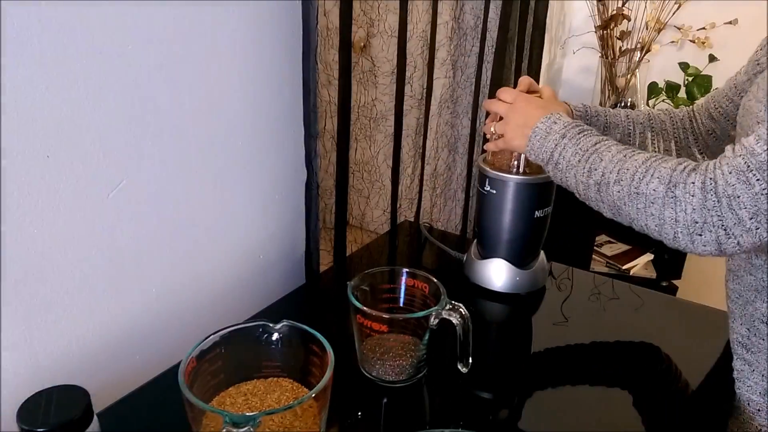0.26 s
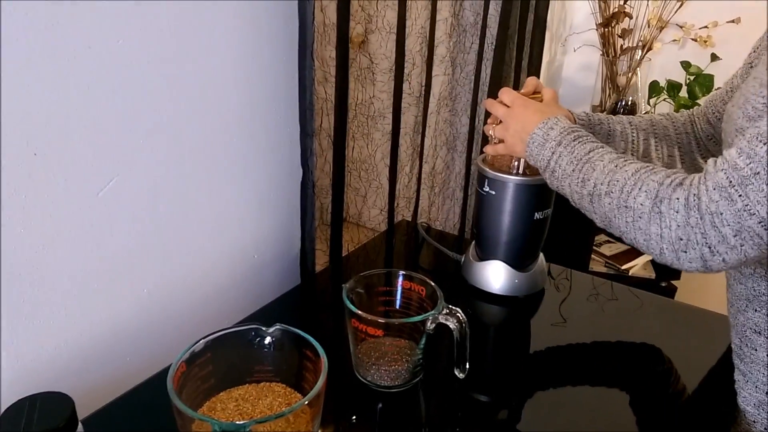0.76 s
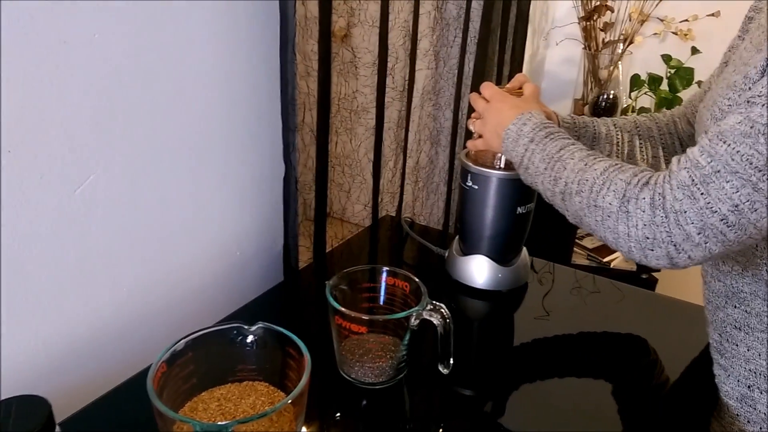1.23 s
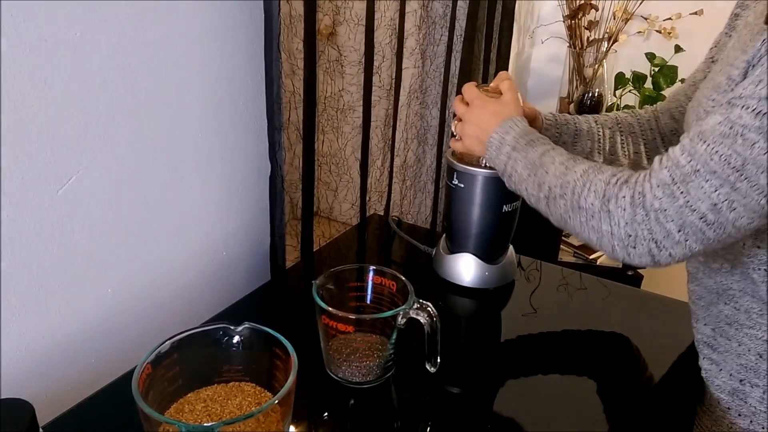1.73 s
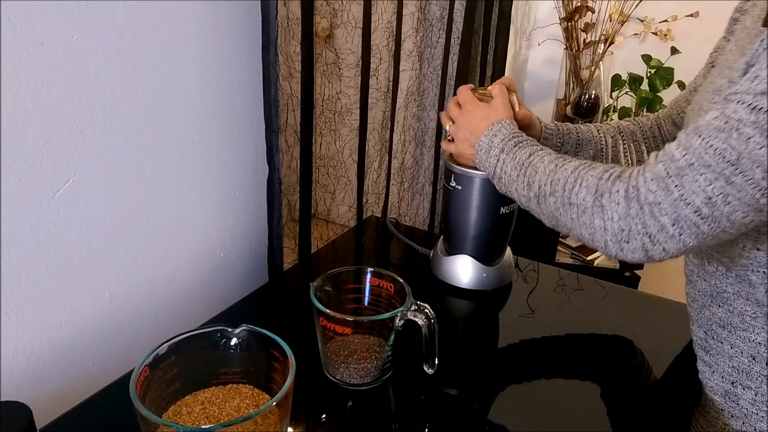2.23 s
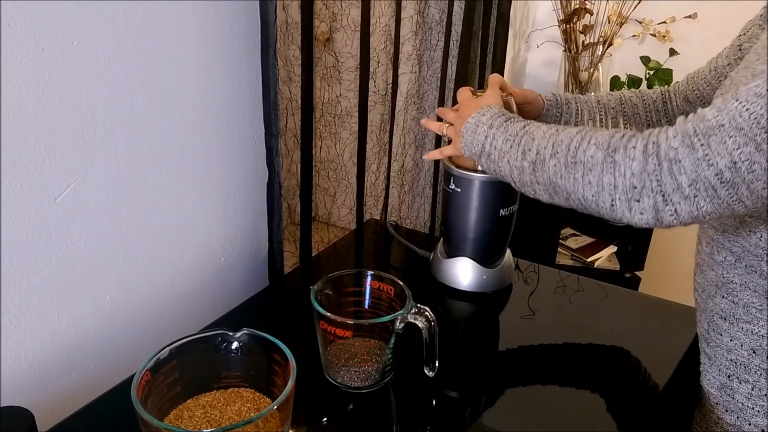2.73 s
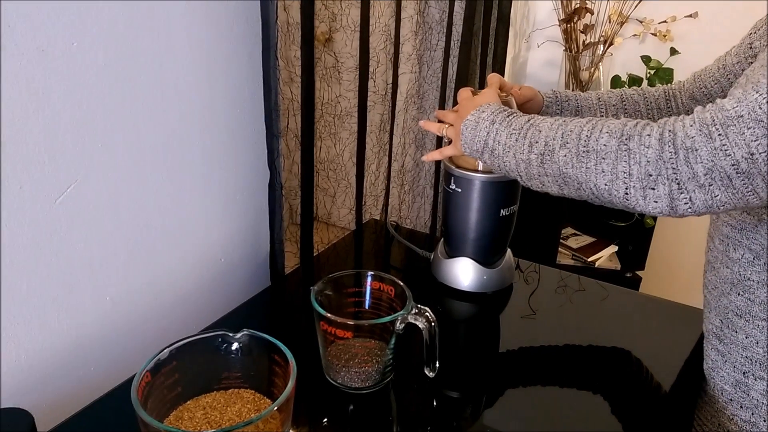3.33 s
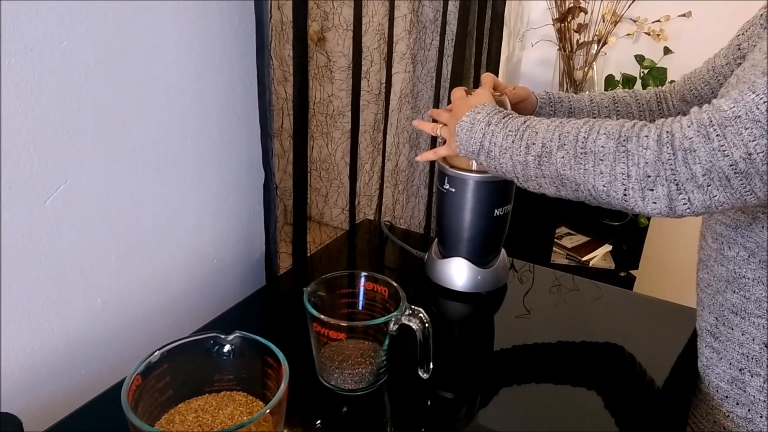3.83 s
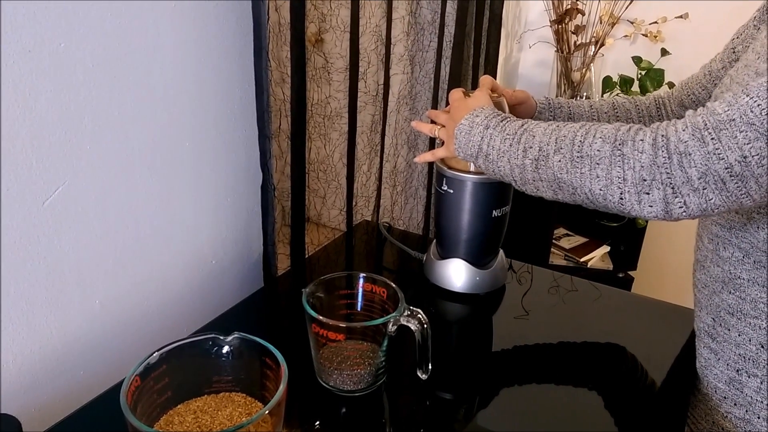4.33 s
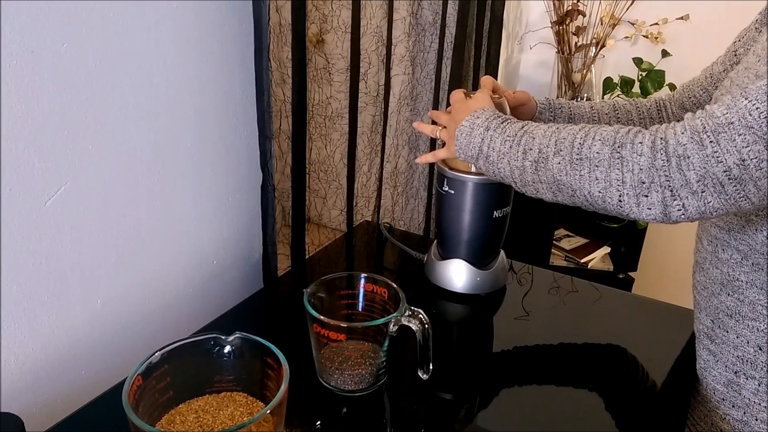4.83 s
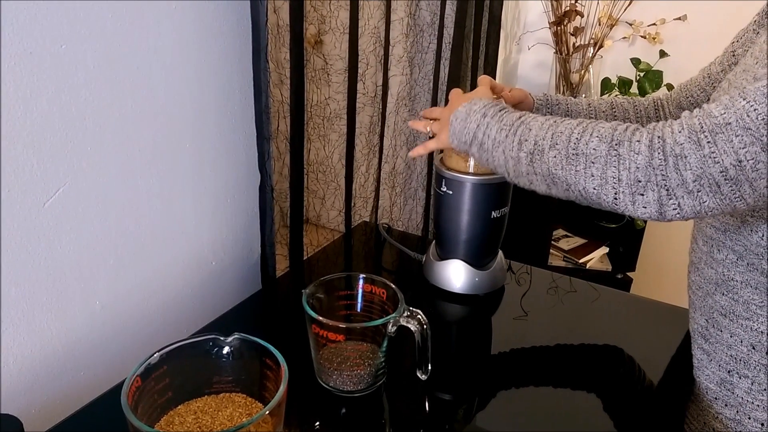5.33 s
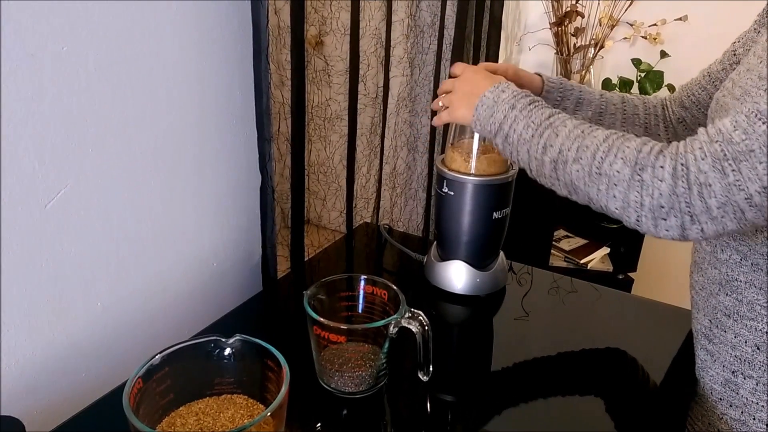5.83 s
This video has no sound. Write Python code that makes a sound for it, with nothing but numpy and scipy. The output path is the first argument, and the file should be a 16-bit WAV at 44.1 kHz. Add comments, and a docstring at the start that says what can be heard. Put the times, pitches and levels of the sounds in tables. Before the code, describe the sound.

Quiet kitchen, light plastic rattles and a sharp double click, then a small blender starts abruptly and runs on, seeds hissing and crackling against plastic.

```python
"""Knocks, clicks and a soft rustle come first: a plastic cup full of hard seeds is set on a small blender's base,
turned and pressed home. Then the motor spins up and the blades fling the seeds against the cup.
Random blows and noise bursts excite resonant bodies; filtered noise gives the rush, the husks and the quiet kitchen.
The left microphone port faces the sound; the right one is shaded and hears it later and duller."""
import sys
import numpy as np
from scipy import signal
from scipy.fft import rfft, irfft, next_fast_len
from scipy.io import wavfile
from scipy.ndimage import uniform_filter1d

SR = 44100
rng = np.random.default_rng(int(sys.argv[2]) if len(sys.argv) > 2 else 0)


def waveform_to_disk(signal):
    """Save audio, clipped to [-1, 1], as 16-bit WAV at the path in sys.argv[1]."""
    frames = np.transpose(np.atleast_2d(signal))
    scaled = np.clip(frames, -1, 1) * 32767
    samples = np.round(scaled).astype(np.int16)
    wavfile.write(sys.argv[1], SR, samples)


N = 267441
SIZE = next_fast_len(N + SR)   # transform length, with room for the reflections
HZ = np.maximum(np.fft.rfftfreq(SIZE, 1 / SR), 1)
TIME = np.arange(N) / SR

# Resonances of the base: (frequency [Hz], width [Hz], relative level [dB])
BASE_MODES = [(174, 84, -35), (247, 44, -19.5), (286.6, 13, -11.5), (356.7, 29, -3.5), (388.8, 18.3, 2),
              (423.5, 27.3, 3), (475, 17.8, -1.5), (502.6, 10.4, -4), (557.5, 42, -4), (579, 98, -11),
              (713, 50, -10.5), (794, 49, -15.5)]
# Resonances of the plastic cup: (frequency [Hz], width [Hz], relative level [dB])
CUP_MODES = [(935, 70, -3.5), (1041, 81, -0.5), (1250, 78, 4), (1383, 82, 5), (1570, 130, 1), (1630, 44, 6),
             (1730, 103, 1), (2150, 300, -22.5), (2270, 170, -27), (2520, 76, -10.5), (2678, 40, -7),
             (2837, 44, -4.5), (2913, 155, -15), (3173, 57, -6.5), (3360, 65, -8.5), (3900, 350, -12),
             (4197, 100, -3), (4356, 160, -7.5), (4547, 59, -3.5), (4878, 126, -6), (4970, 67, -12),
             (5097, 77, -11.5), (7500, 72, -18)]
# Seeds in flight against the cup wall: (time [s], relative level [dB])
FLIGHT_LEVEL = [(1.81, -34), (1.82, -31.5), (1.89, -18.5), (1.96, -20.5), (2.08, -18.5), (2.12, -24),
                (2.19, -19.5), (2.57, -19.5), (2.64, -22.5), (2.73, -19), (2.79, -22), (2.86, -20),
                (3.17, -19), (3.23, -20.5), (3.3, -19.5), (5.53, -19.5), (5.58, -17.5), (5.72, -19),
                (5.75, -21.5), (5.79, -19.5), (6.0, -19), (6.04, -22.5)]
# Shaking of the base, in two lurches at first: (time [s], relative level [dB])
SHAKE_LEVEL = [(1.81, -28.5), (1.83, -28), (1.91, -23), (1.96, -29.5), (2.02, -23), (2.13, -31), (2.7, -28),
               (2.85, -26.5), (3.9, -26.5), (4.0, -31.5), (4.4, -27), (5.7, -29), (5.78, -34), (5.9, -25),
               (6.06, -31.5)]
# Early clumps of shattering whole seeds: (time [s], added level [dB])
HUSK_CLUMPS = [(1.9, 1.3), (2.07, 4.3)]
# Spectrum of the cracking husks: (frequency [Hz], relative level [dB])
HUSK_SPECTRUM = [(1500, -18), (3000, -8), (5000, 2.5), (8000, -1.5), (10000, -2.5), (13000, -9.5),
                 (15000, -8.5), (15800, -25)]
# Spectrum of air and dust whirled by the blades: (frequency [Hz], relative level [dB])
RUSH_SPECTRUM = [(600, -24), (1500, -8), (2050, -2), (2800, -1.5), (4500, -3), (6000, -11.5), (8000, -17),
                 (11000, -39.5), (15800, -62)]
START_S = 1.81   # the motor switches on
RUN_HZ, SPIN_UP_S = 214, 0.1   # final shaft turns per s, time constant
LAG_HZ, EASE_S = 12, 1.0   # turns per s held back by the load, time constant of its easing
FLIGHT_MEAN_DB, FLIGHT_FLICKER_DB, SHAKE_FLICKER_DB = -17.5, 0.5, 1.5
# Whole husks fade away; their level swings along with the flight, with a flicker of its own
HUSK_DB, HUSK_FADE_DB_PER_S, HUSK_FOLLOWS, HUSK_FLICKER_DB = -20.5, 4, 1, 2
CLUMP_S = 0.012   # half length of a clump, to 1/e of its added dB
# Meal gathers in the cup
MEAL_DB, MEAL_SHORT_DB, MEAL_BUILD_S, MEAL_GROWS_DB_PER_S = -26.5, 12.5, 0.19, 0.17
MEAL_FOLLOWS, MEAL_FLICKER_DB = 0.79, 1.5
HUM_DB, HUM_EARLY_DB, HUM_SETTLE_S = -43.5, 4, 1.2
HUM_FROM_S, HUM_WAVER_DB, HUM_WAVER_PER_S = 1.93, 2, 4


def blender():
    """Impact excitation: thousands of blows a second ring cup and base, harder once a turn; the shaft hums."""
    running = np.maximum(TIME - START_S, 0)
    spin_up = (RUN_HZ - LAG_HZ) * np.exp(-running / SPIN_UP_S)
    turns = RUN_HZ - spin_up - LAG_HZ * np.exp(-running / EASE_S)

    wall_db = in_time(FLIGHT_LEVEL)[0] + FLIGHT_FLICKER_DB * drift(12.5)
    swing_db = wall_db - FLIGHT_MEAN_DB
    husk_db = HUSK_DB - HUSK_FADE_DB_PER_S * running + HUSK_FOLLOWS * swing_db + HUSK_FLICKER_DB * drift(9.5)
    husk_db = husk_db + sum(db * np.exp(-((TIME - s) / CLUMP_S) ** 2) for s, db in HUSK_CLUMPS)
    meal_db = MEAL_DB - MEAL_SHORT_DB * np.exp(-running / MEAL_BUILD_S) + MEAL_GROWS_DB_PER_S * running
    meal_db = meal_db + MEAL_FOLLOWS * swing_db + MEAL_FLICKER_DB * drift(15.0)
    base_db = in_time(SHAKE_LEVEL)[0] + SHAKE_FLICKER_DB * drift(7.0)
    hum_db = HUM_DB + HUM_EARLY_DB * np.exp(-running / HUM_SETTLE_S) + HUM_WAVER_DB * drift(HUM_WAVER_PER_S)

    angle = 2 * np.pi * np.cumsum(turns) / SR
    sweep = (1 + 0.16 * np.cos(angle)) * (TIME >= START_S)

    # five rows: the near side of the cup, then four far sides
    blows = impacts(1500, spread_db=3.0, count=5)
    high_modes = [mode for mode in CUP_MODES if mode[0] > 2000]
    low_modes = [mode for mode in CUP_MODES if mode[0] < 2000]
    wall = from_db(wall_db + 1.5) * rms_one(body(blows, high_modes))
    meal = from_db(meal_db) * rms_one(body(blows, low_modes))
    air_noise = rng.standard_normal((5, N))
    rush = from_db(wall_db) * rms_one(shape(air_noise, from_db(at_hz(RUSH_SPECTRUM, HZ))))
    cracks = impacts(6000, spread_db=2.5, count=5)
    husks = from_db(husk_db) * rms_one(shape(cracks, from_db(at_hz(HUSK_SPECTRUM, HZ))))
    shaking = impacts(450, spread_db=2.0, count=1)[0]
    base = from_db(base_db) * rms_one(body(shaking, BASE_MODES))

    spun_up = np.clip((TIME - HUM_FROM_S) / 0.017, 0, 1)
    hum = from_db(hum_db) * spun_up * np.sin(angle)
    small = signal.butter(2, 170, "high", fs=SR, output="sos")   # a small body radiates little bass
    grinding = signal.sosfilt(small, sweep * (wall + meal + rush + husks))
    return grinding, signal.sosfilt(small, sweep * base) + hum


# Knocks of the cup against the base, and near 1.81 s the jolt of the motor starting, relative levels: (time
# [s], dull snap [dB], bright snap [dB], thud in the base [dB], push into the counter [dB])
KNOCK_EVENTS = [(0.029, -61, -79, -46.5, -50), (0.107, -55, -62, -45, -49),
                (0.162, -27.5, -30.5, -30.5, -28), (0.17, -36, -41, -21.5, -47),
                (0.543, -58, -39.5, -52.5, -59), (0.66, -51, -47, -61, -64), (0.81, -29.5, -34.5, -41, -55),
                (0.815, -33, -49, -28, -46), (1.109, -53, -50, -63, -57), (1.12, -53, -41.5, -58, -65),
                (1.134, -60, -47, -61, -64), (1.153, -48, -42, -70, -66), (1.164, -55, -54, -69, -68),
                (1.191, -51, -38, -66, -64), (1.236, -15, -14, -13, -26.5), (1.245, -20, -20, -38, -46),
                (1.248, -36, -10.5, -59, -47), (1.259, -27, -44, -47, -40), (1.447, -49, -45, -51, -51),
                (1.735, -59, -36.5, -62, -64), (1.804, -32, -44, -37, -38), (1.811, -15, -9.5, -22, -28),
                (1.826, -10, -27, -9.5, -24.5)]
# Spectrum of the plastic snap: (frequency [Hz], relative level [dB])
SNAP_SPECTRUM = [(400, -57), (800, -8), (1500, 3), (3000, 6), (5000, 2.5), (7000, -6), (9000, -3.5),
                 (12000, -19), (15800, -17)]
# Resonances of the counter top: (frequency [Hz], width [Hz], relative level [dB])
COUNTER_MODES = [(172, 34, 9.5), (210, 170, 3.5)]
# Resonances of the cupboard below: (frequency [Hz], width [Hz], relative level [dB])
CABINET_MODES = [(35, 30, -11), (70.4, 27, 4.5)]
SNAP_T60_S = 0.016
THUD_IN_BASE_DB, THUD_IN_COUNTER_DB, THUD_IN_CABINET_DB = 33, 29.5, 12   # how strongly each body answers


def knocks():
    """Modal response: each rattle and push rings cup, base and counter; also the same blows as clean clicks."""
    bursts, clicks = np.zeros((2, N)), np.zeros((4, N))
    age = np.arange(2000) / SR
    fade = np.minimum(age / 0.0019, 1) * from_db(-60 * age / SNAP_T60_S)
    click_gain = np.sqrt(np.sum(fade ** 2))   # a click carries the energy of its burst
    for s, *levels_db in KNOCK_EVENTS:
        at = round((s - 0.0005) * SR)
        bursts[:, at:at + len(age)] += from_db(levels_db[:2])[:, None] * fade
        clicks[:, at] = from_db(levels_db) * click_gain

    # dull and bright snaps share the spectrum about a crossover at 3200 Hz
    bright = 1 / (1 + (3200 / HZ) ** 3)
    colour = from_db(at_hz(SNAP_SPECTRUM, HZ) + 17.5) * np.array([1 - bright, bright])
    snaps = shape(bursts * rng.standard_normal((2, N)), colour).sum(axis=0)
    clean = shape(clicks[:2], colour).sum(axis=0)

    thuds = from_db(THUD_IN_BASE_DB) * body(clicks[2], BASE_MODES)
    thuds = thuds + from_db(THUD_IN_COUNTER_DB) * body(clicks[3], COUNTER_MODES)
    thuds = thuds + from_db(THUD_IN_CABINET_DB) * body(clicks[2], CABINET_MODES)
    knocked = snaps + from_db(-5) * body(snaps, CUP_MODES) + thuds
    return knocked, from_db(-5.5) * (clean + thuds)


# Hands shifting on the cup: (start [s], end [s], level [dB])
HAND_MOVES = [(0.0, .075, -63), (.1, .155, -61), (.752, .805, -83), (1.75, 1.8, -66)]
# Spectrum of skin on plastic: (frequency [Hz], relative level [dB])
SKIN_SPECTRUM = [(300, -25), (600, -3), (1000, 10), (1500, 3), (2300, 6), (3300, -9), (5000, -19),
                 (9000, -28)]


def rustle():
    """Friction noise: shaped random noise sounds while the fingers move."""
    level = sum(from_db(db) * (TIME >= start) * (TIME < end) for start, end, db in HAND_MOVES)
    friction = rms_one(shape(rng.standard_normal(N), from_db(at_hz(SKIN_SPECTRUM, HZ))))
    return uniform_filter1d(level, size=300) * friction


# Reverberation time: (frequency [Hz], time to fall 60 dB [s])
REVERB_TIME = [(150, 0.075), (400, 0.28), (1040, 0.52), (2760, 0.33), (7280, 0.38), (14000, 0.15)]
# Strength of the reflections: (frequency [Hz], relative level [dB])
REVERB_LEVEL = [(150, -5.5), (500, 5.5), (1500, 3.5), (5000, -0.5), (14000, -1)]


def kitchen():
    """Diffuse reverberation: noise for both ports dies exponentially band by band, shared in the bass."""
    age = np.arange(SR // 2) / SR
    white = rng.standard_normal((2, 2, len(age)))   # neighbouring bands get unrelated noise
    tail = 0
    edges = 60 * 2 ** np.arange(0, 8.4, 1.0)   # octaves
    for k, (low, high) in enumerate(zip(edges, edges[1:])):
        hz = np.sqrt(low * high)
        band = signal.butter(2, [low, high], "band", fs=SR, output="sos")
        mid, side = signal.sosfilt(band, white[k % 2])
        alike = np.clip(450 / hz, 0, 0.9)
        onset = np.clip((age - 0.002) / 0.0041, 0, 1)
        dying = from_db(-60 * age / at_hz(REVERB_TIME, hz)) * onset
        pair = two_ports(mid, side, alike)
        tail = tail + from_db(at_hz(REVERB_LEVEL, hz)) * pair * dying / np.sqrt(2 * np.sum(dying ** 2))
    return rfft(tail, SIZE)


# Spectrum of the quiet kitchen: (frequency [Hz], relative level [dB])
AIR_SPECTRUM = [(12, -48), (20, -3), (27, -2), (55, -10), (119, -14), (149, -4), (187, -12.5), (443, -14),
                (482, -15), (655, -25.5), (1840, -20), (13400, -37.5), (15800, -42)]
# Likeness of that hush at the two ports: (frequency [Hz], left-right likeness [0 to 1])
AIR_LIKENESS = [(60, 0.49), (300, 0.8), (640, 0.77), (1400, 0.0093), (15000, 0)]
# Appliance hum: (frequency [Hz], relative level [dB])
MAINS_TONES = [(120, -61), (180, -83.5), (240, -77), (300, -70), (420, -67.5), (480, -70.5)]


def quiet_air():
    """Partial coherence: a steady hush, most alike at the ports in the low mids, over a faint mains hum."""
    mid, side = rfft(rng.standard_normal((2, N)), SIZE)
    pair = two_ports(mid, side, np.clip(at_hz(AIR_LIKENESS, HZ), 0, 1))
    hush = rms_one(irfft(pair * from_db(at_hz(AIR_SPECTRUM, HZ)), SIZE)[:, :N])
    hum = sum(from_db(db - 3.0) * np.sin(2 * np.pi * hz * TIME) for hz, db in MAINS_TONES)
    return (from_db(-59.5) * hush + hum) * from_db([[1.2], [-1.2]])   # left a little louder


def from_db(db):
    """Logarithmic level: decibels to amplitude gain."""
    return 10 ** (np.asarray(db) / 20)


def rms_one(x):
    """Normalisation: scale to unit rms."""
    return x / np.sqrt(np.mean(x ** 2) + 1e-20)


def in_time(rows):
    """Linear interpolation: columns of a curve table, one value per sample."""
    s, *columns = np.transpose(rows)
    return [np.interp(TIME, s, column) for column in columns]


def at_hz(points, hz):
    """Logarithmic pitch axis: a spectrum table interpolated over log frequency."""
    table_hz, values = np.array(points).T
    return np.interp(np.log(hz), np.log(table_hz), values)


def shape(x, gain):
    """Linear filtering: multiply the spectrum by a gain per frequency."""
    return irfft(rfft(x, SIZE) * gain, SIZE)[..., :N]


def two_ports(mid, side, alike):
    """Coherence: mix two unrelated noises into a left-right pair of given likeness."""
    return np.sqrt(1 + alike) * mid + np.sqrt(1 - alike) * side * [[1], [-1]]


def body(force, modes):
    """Modal superposition: parallel damped resonances of alternating sign."""
    out = 0
    for k, (hz, width_hz, db) in enumerate(modes):
        r = np.exp(-np.pi * width_hz / SR)
        zeros = [(1 - r * r) / 2, 0, (r * r - 1) / 2]
        poles = [1, -2 * r * np.cos(2 * np.pi * hz / SR), r * r]
        out = out + (-1) ** k * from_db(db) * signal.lfilter(zeros, poles, force + 1e-18)
    return out


def impacts(per_s, spread_db, count):
    """Shot process: random tiny blows of uneven size and sign, in unrelated rows."""
    sizes = from_db(spread_db * np.minimum(rng.exponential(1, (count, N)), 5))
    signs = rng.choice([-1, 1], (count, N))
    return sizes * signs * (rng.random((count, N)) < per_s / SR)


def drift(per_s):
    """Low-passed randomness: slow wandering with unit rms."""
    r = np.exp(-2 * np.pi * per_s / SR)
    return rms_one(signal.lfilter([1], [1, -2 * r, r * r], rng.standard_normal(N + SR))[SR:])


# Extra gain of the direct sound at the right port: (frequency [Hz], level [dB])
FAR_PORT_DIRECT = [(500, 1), (1500, -7.5), (4000, -16), (8000, -24), (14000, 6)]
# Left port over right, for direct and reflected sound: (frequency [Hz], level difference [dB])
PORT_SHADE = [(60, 2), (200, 4.5), (380, 2.5), (700, 0.5), (1290, 3), (1680, -1), (2050, 2), (2600, 4),
              (4400, 9.5), (8120, 12), (10500, 18), (13000, 14.5), (15000, 30)]
RIGHT_LAG_S = 0.00023
MOTOR_DB = 9   # gain of the running machine, ahead of the recorder's compression
HOLLOW_HZ, HOLLOW_WIDTH_HZ, HOLLOW_DEPTH = 2047, 230, 0.28   # the counter's echo weakens a band


def scene():
    """Direct and reverberant field: the near side is direct; walls return other sides, different at each port."""
    knocked, blows = knocks()
    hands = rustle()
    grinding, base = [from_db(MOTOR_DB) * part for part in blender()]
    hollow = 1 - HOLLOW_DEPTH * np.exp(-((HZ - HOLLOW_HZ) / HOLLOW_WIDTH_HZ) ** 2)
    cup = rfft(grinding, SIZE) * hollow

    facing = np.array([np.ones(len(HZ)), from_db(at_hz(FAR_PORT_DIRECT, HZ))])
    direct = (rfft(knocked + hands + base, SIZE) + cup[0]) * facing
    far_sides = cup[1:3] * kitchen() + cup[3:] * kitchen()
    reflected = rfft(blows + hands + from_db(-5.5) * base, SIZE) * kitchen() + far_sides / np.sqrt(2)

    late = np.exp(-2j * np.pi * HZ * RIGHT_LAG_S)
    ports = np.array([np.ones(len(HZ)), late * from_db(-at_hz(PORT_SHADE, HZ))])
    return irfft((direct + reflected) * ports, SIZE)[:, :N] + quiet_air()


LOUD_DB, SQUEEZE, REACT_S = -42.5, 0.25, 0.057   # threshold, dB removed per dB above it, time constant
CUTOFF_HZ = 16000


def record(dry):
    """Dynamic compression: loud passages are turned down, the highest peaks rounded and the top cut."""
    r = np.exp(-1 / (REACT_S * SR))
    power = signal.lfilter([1 - r], [1, -r], np.mean(dry ** 2, axis=0))
    level_db = 10 * np.log10(power + 1e-12)
    held = dry * from_db(-SQUEEZE * np.maximum(level_db - LOUD_DB, 0))
    rounded = held / (1 + held ** 6) ** (1 / 6)
    return signal.sosfilt(signal.cheby2(12, 60, CUTOFF_HZ, fs=SR, output="sos"), rounded)


dry = scene()
out = record(dry)
waveform_to_disk(out)
```